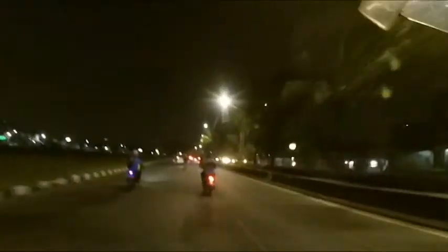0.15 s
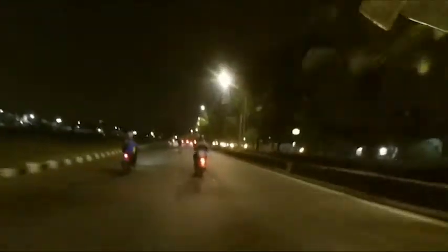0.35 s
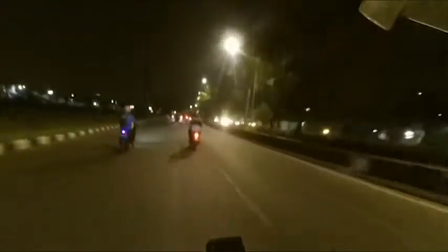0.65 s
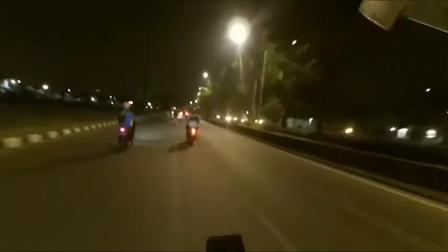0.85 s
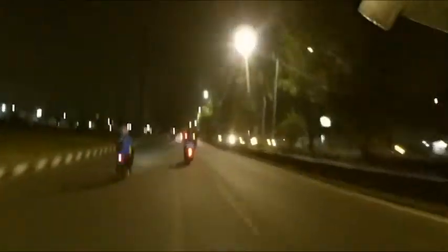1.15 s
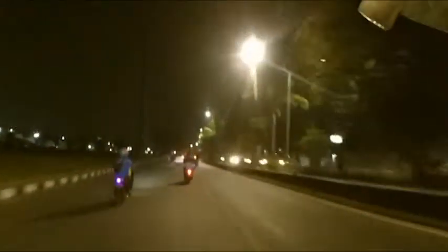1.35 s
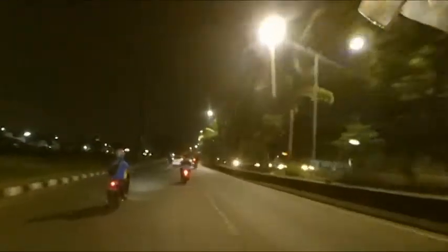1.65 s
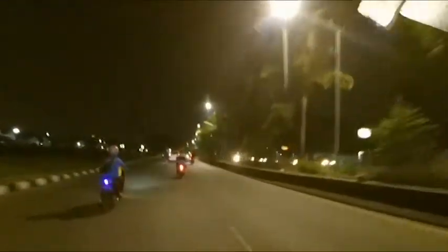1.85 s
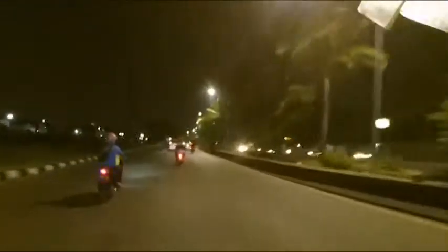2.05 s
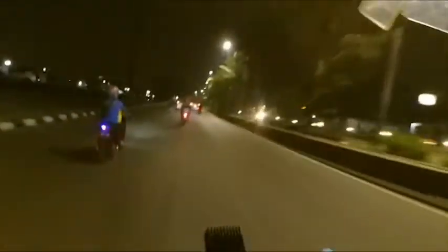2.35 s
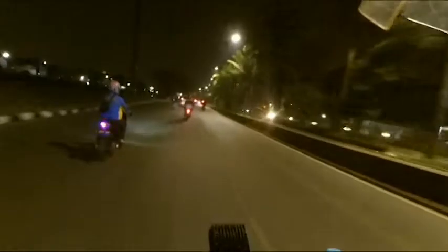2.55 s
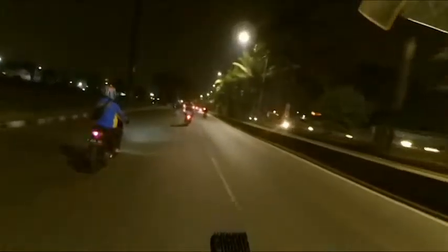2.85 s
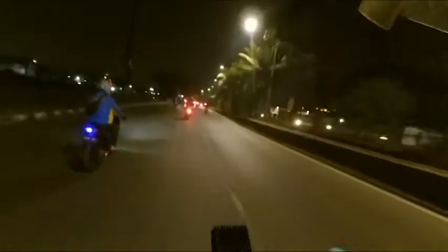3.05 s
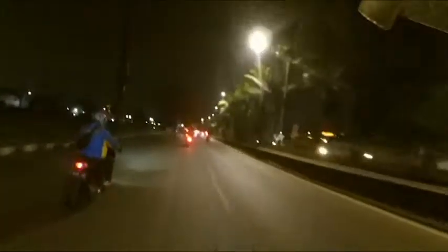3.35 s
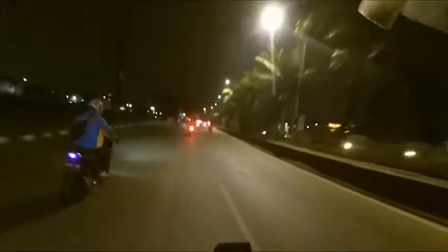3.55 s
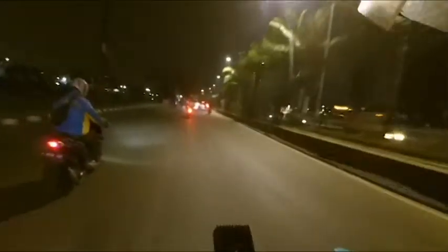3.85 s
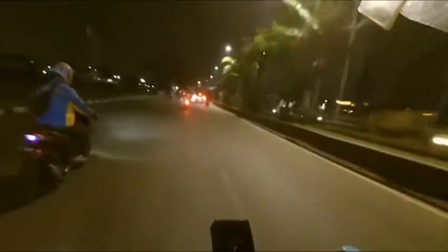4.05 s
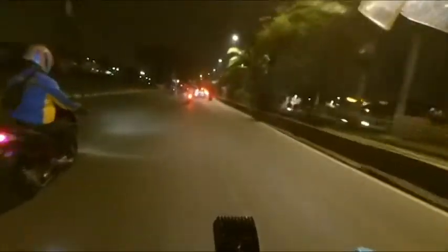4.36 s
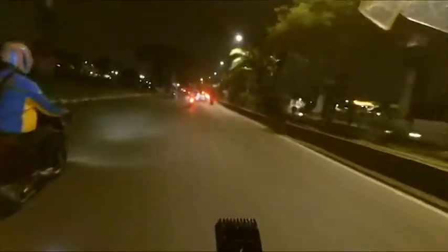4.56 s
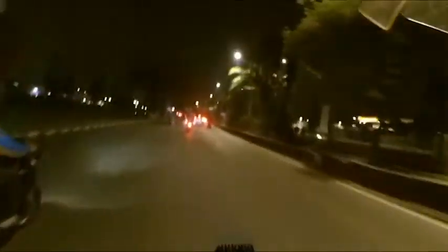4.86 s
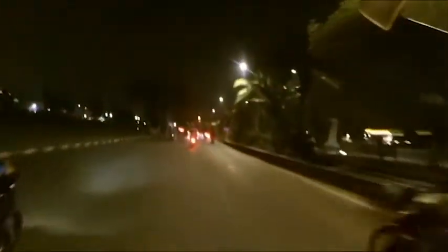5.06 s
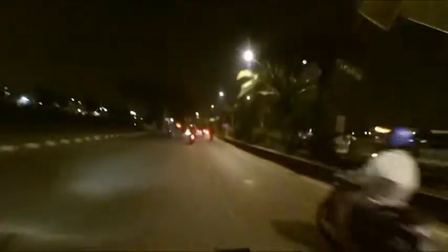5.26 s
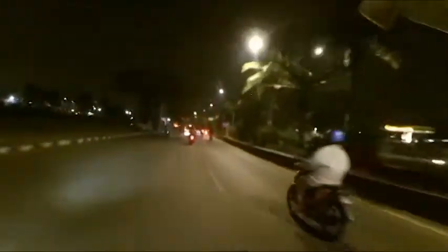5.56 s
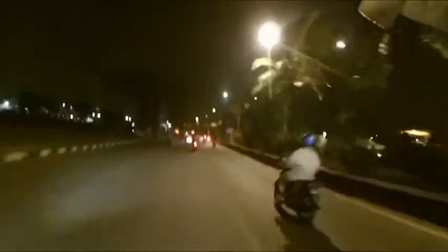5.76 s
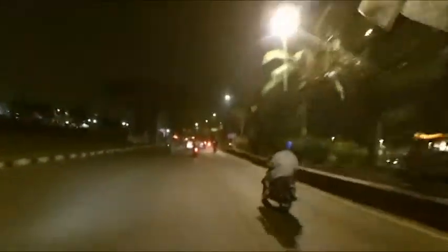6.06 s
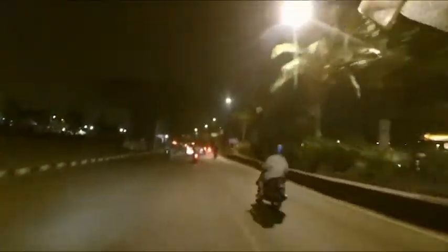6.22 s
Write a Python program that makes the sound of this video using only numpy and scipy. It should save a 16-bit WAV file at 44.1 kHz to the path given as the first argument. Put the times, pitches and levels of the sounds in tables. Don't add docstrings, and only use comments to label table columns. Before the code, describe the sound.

Throughout about 6.4 seconds, strong wind strikes a bare microphone on a moving motorcycle, almost identical in both channels and without room echo. Deep rumble and fluttering turbulence dominate, with uneven bassy thumps. Early blows come around 0.25 and 0.7 s, then a relative lull in big hits until about 1.9; a very heavy one lands at 2.2, and dense buffeting runs from 3.4 to 4.7. Beneath it a single-cylinder engine drones steadily at about 44 firings per second, barely rising. From 3 s its exhaust and dry metallic valve ticking grow stronger, peaking near 5.1-5.4. Faint frame singing, tyre roar and airy hiss continue. Around 5.0 a close motorcycle falls behind with a bright rush; about 5.45 another overtakes, duller. After 5.7 the bark and ticking ease, while wind thumps and whistling air carry on to the abrupt end.

```python
import sys
import numpy as np
from scipy import signal
from scipy.fft import rfft, irfft, next_fast_len
from scipy.io import wavfile
from scipy.ndimage import uniform_filter1d, map_coordinates

SR = 44100
rng = np.random.default_rng(int(sys.argv[2]) if len(sys.argv) > 2 else 0)


def to_linear_factor(level_db):
    exponent = np.asarray(level_db, float) / 20
    return 10 ** exponent


def store_pcm(level_fs):
    pcm = np.round(np.clip(level_fs, -1, 1) * 32767).astype(np.int16)
    wavfile.write(sys.argv[1], SR, np.atleast_2d(pcm).T)


N = 281799

# time in seconds, steady strength in dB, fineness (small eddies over big) in dB.
WIND_STRENGTH = [(0, -27, -4.5), (.35, -23, 1), (.55, -28, 1.5), (.9, -27, 2.5), (1.25, -26, 3.5),
                 (1.42, -23.5, -4), (1.6, -24, 3), (1.9, -24.5, 1), (2.45, -24, 0.1), (2.8, -23, -1.2),
                 (3.35, -21, -1.4), (3.62, -22, 0), (4, -20, 0.5), (4.25, -25.5, 3), (4.5, -20.5, 1),
                 (5.1, -23, 2.1), (5.35, -24, -0.5), (6.39, -20, -1.5)]
# frequency in Hz, density in dB per Hz.
BIG_EDDY_COLOUR = [(2, -24), (4, -30), (7, 14.5), (20, 7.5), (35, 10.5), (50, 0.5), (90, -34), (200, -75),
                   (600, -140)]
RUMBLE_COLOUR = [(20, -11), (40, 1), (55, 1.5), (100, -0.5), (150, -4), (200, -34.5), (400, -62),
                 (1500, -140)]
FLUTTER_COLOUR = [(80, -27), (150, -1), (190, 0), (300, -8.5), (450, -16), (800, -28.5), (1500, -37.5),
                  (4000, -57), (9000, -140)]
# time in seconds, pressure (mostly suction) in full scale,
# half-height width in ms, wake in dB.
LARGE_THUMPS = [(0.248, 0.57, 10.2, 12), (0.28, -0.45, 9.5, 10), (0.729, 0.33, 11, 11),
                (1.942, -0.38, 10, 4), (2.043, -0.45, 8.2, 10), (2.24, -0.82, 6.1, 14),
                (2.699, -0.53, 5.5, 2), (2.715, -0.3, 6, 13.5), (2.888, -0.29, 7.9, 5),
                (3.029, 0.14, 4, 8.5), (3.489, -0.73, 12.2, 5.5), (3.663, -0.59, 11, 5),
                (3.776, -0.36, 9.2, 2.5), (3.949, -0.63, 7.8, 7.5), (3.996, -0.5, 13, 13),
                (4.111, 0.4, 17, 6), (4.141, -0.33, 7.7, 6.5), (4.445, 0.35, 8.3, 3),
                (4.504, -0.41, 10.3, 0), (4.59, 0.37, 16, 7.5), (4.624, -0.39, 8.8, 5),
                (4.699, -0.23, 11, 4), (4.969, 0.32, 9.2, 3.5), (5.433, 0.23, 7.6, 8),
                (5.549, -0.36, 11.6, 6), (5.729, -0.33, 4.3, 7.5), (5.959, -0.26, 28, 9),
                (6.052, 0.5, 7.2, 8), (6.109, -0.32, 12.6, 7), (6.269, -0.43, 13.3, 6)]
# time in seconds, pressure in full scale, half-height width in ms.
LESSER_THUMPS = [(0.219, -0.46, 6.4), (0.229, -0.33, 4.8), (0.268, -0.5, 8.1), (0.295, 0.32, 4.7),
                 (0.329, 0.14, 22), (0.676, -0.25, 5.7), (0.688, 0.26, 4.2), (0.719, -0.31, 9.6),
                 (0.904, 0.26, 5.4), (1.397, -0.25, 6.2), (1.9, -0.2, 19), (1.956, 0.13, 25),
                 (2.088, -0.31, 6.2), (2.111, 0.24, 8), (2.204, -0.19, 5.6), (2.216, 0.28, 7.4),
                 (2.262, 0.18, 7.4), (2.582, -0.21, 9.9), (2.688, 0.22, 16), (3.013, -0.11, 3.9),
                 (3.284, -0.22, 17), (3.447, -0.34, 2.1), (3.462, 0.14, 12), (3.529, 0.28, 5.7),
                 (3.653, 0.15, 9.6), (3.68, 0.076, 20), (3.827, -0.13, 12), (3.839, 0.34, 5.1),
                 (3.871, 0.33, 6.3), (3.889, -0.31, 6.9), (3.926, 0.29, 5.1), (3.938, 0.28, 5.7),
                 (3.96, 0.093, 4.6), (3.976, 0.3, 9.2), (3.988, 0.29, 8.4), (4.049, 0.17, 3.8),
                 (4.13, 0.22, 8.7), (4.169, 0.17, 5.4), (4.237, -0.083, 6.5), (4.368, 0.14, 18),
                 (4.388, -0.19, 16), (4.479, 0.2, 4.2), (4.514, -0.26, 5.4), (4.532, 0.27, 10),
                 (4.545, -0.025, 4.2), (4.579, 0.09, 4), (4.679, 0.19, 9.4), (4.755, 0.18, 3.7),
                 (4.774, -0.21, 11), (4.986, -0.29, 2.5), (5.002, -0.22, 3), (5.448, -0.29, 3.9),
                 (5.469, -0.27, 9.5), (5.536, 0.14, 4.6), (5.935, 0.26, 24), (6.026, -0.23, 6.2),
                 (6.092, 0.3, 3.4), (6.241, 0.31, 5.9), (6.303, 0.16, 9.9), (6.346, -0.27, 5.5)]
# time in seconds, half length in seconds, then big, middle and small eddies in dB.
GUSTS_AND_LULLS = [(0.055, 0.064, 4.5, 4.5, 5), (0.657, 0.047, -3, -1.5, 5), (0.836, 0.076, 3, 1.5, 0),
                   (1.105, 0.035, 12.5, -12, -5), (1.6, .12, -1, -4, -4), (0.545, .05, 3.5, 4.5, -2.5),
                   (1.05, 0.044, -2, 3, 2.5), (1.703, 0.067, 4, 0, -4.5), (1.97, 0.081, -10, 3, -3),
                   (2.303, 0.069, 2.5, -2, -2), (4.42, 0.14, -3, 4, 0.5), (4.676, 0.047, -3, 6, 2),
                   (1.893, 0.057, -10, 3, 3.5), (2.148, 0.12, 6, -6, 1.5), (2.713, 0.063, 2, -4, -0.5),
                   (3.15, 0.059, -7.5, 0.5, -1), (3.44, 0.06, 2, 6.5, 0.5), (3.615, 0.085, 2.5, -5, -1.5),
                   (4.353, 0.074, 6.5, -0.5, -2), (4.504, 0.12, -2, 3.5, 2.5), (4.794, 0.07, -1, 0, 0),
                   (4.955, 0.063, -4, -6, -2.5), (5.27, 0.044, 0.5, -2, -0.5), (5.72, 0.056, -6, -1, -3),
                   (5.143, 0.085, -6, -4.5, -7), (5.297, 0.044, 3, -0.5, -0.5), (5.746, 0.067, 2, -2.5, 0),
                   (5.89, 0.053, -15, -4.5, 0), (6.16, 0.032, -5, -8.5, -5)]
# time in seconds, firings per second.
FIRING_RATE = [(0.0, 43.622), (0.8, 44.187), (1.6, 44.153), (2.4, 44.281), (3.19, 44.468), (3.99, 44.688),
               (4.79, 44.786), (5.59, 44.781), (6.39, 44.614)]
# time in seconds, load in dB, throttle bark in dB, valve force in dB,
# hot gas in dB (the middle pipe sounds higher).
ENGINE_LOAD = [(0, -3.5, -6, -3, -12), (.8, -7, 0.5, -1, -14), (1.6, 0, -1, -5, -11),
               (2.4, 3.5, 0, 6.5, -10), (3.2, 13, 3.5, 8, -19), (4, 12.5, 0, 4, -15), (4.3, 12, 3, 12, -15),
               (4.6, 0, 1, 6, -10), (4.9, 6, 1.5, 9, -11), (5.1, 14.5, 6.5, 17.5, -8),
               (5.4, 10, 7, 10, -11), (5.65, 8, 7, 11, -3), (5.85, -6, 1.5, 5, -3), (6.05, -13, -7, -6, 4),
               (6.39, 1, -5, -11, -1)]
# frequency in Hz, width in Hz, level in dB.
LOW_PIPE_MODES = [(244, 147, -2), (349, 35, -8.5)]
HIGH_PIPE_MODES = [(698, 46, 3), (880, 120, 1)]
VALVE_MODES = [(4700, 1400, 17), (6750, 1360, 27), (7670, 1700, 25.5), (11400, 5000, 7)]
# time in seconds, peak in dB.
HARD_SEATINGS = [(1.3024, -50), (1.8448, -47), (2.0259, -43), (2.1397, -43), (2.3655, -42), (2.637, -41),
                 (2.7719, -51), (2.8169, -55), (2.8395, -46), (3.0418, -41), (3.1767, -39), (3.199, -40),
                 (3.2212, -54), (3.3113, -44), (3.3338, -42), (3.356, -39), (3.3783, -43), (3.4236, -44),
                 (3.492, -37), (3.5358, -38), (3.5584, -42), (3.5802, -35), (3.626, -31), (3.6474, -48),
                 (3.6706, -42), (3.715, -35), (3.7374, -47), (3.7821, -49), (3.8046, -40), (3.8275, -35),
                 (3.8495, -40), (3.8947, -42), (3.917, -35), (3.939, -41), (3.9615, -43), (3.9836, -38),
                 (4.0284, -33), (4.0509, -43), (4.1625, -31), (4.2526, -39), (4.4533, -41), (4.4979, -47),
                 (4.5215, -41), (4.6544, -41), (4.6765, -35), (4.7231, -42), (4.81, -33), (4.9448, -37),
                 (4.9675, -37), (5.0118, -31), (5.0341, -35), (5.0563, -32), (5.1008, -31), (5.124, -31),
                 (5.257, -26), (5.2795, -32), (5.324, -26), (5.3693, -29), (5.4369, -36), (5.5926, -36)]
# frequency in Hz, width in Hz, level in dB, start in seconds, length in seconds.
FRAME_MODES = [(1842, 45, -59.5, -.5, 1.75), (1820, 90, -64, 1.1, 2.1), (1812, 50, -61, 3, 1.6),
               (1832, 55, -57.5, 4.9, .7), (2510, 80, -65.5, 0, 1.7), (2675, 41, -66, 2, 2.8),
               (2675, 60, -64, 5.3, 1.4), (3100, 250, -64.5, 5.3, 1.4), (3400, 200, -68, 0, 1.4),
               (3660, 200, -66.5, -.5, 1.9), (3400, 170, -72, 1.8, 2.6), (3780, 120, -69.5, 2, 3),
               (4050, 250, -65, 3.7, .6), (7100, 700, -59, 3.35, .4), (6400, 370, -57.5, 3.8, .55)]
# time abreast in seconds, side gap in m, speed over ours in m/s,
# tyres in dB at 1 m, dragged air in dB abreast, tyres dull above Hz.
NEIGHBOURS = [
    (4.98, 1.9, -5, 3.5, -47.5, 6000),
    (5.45, 3.65, 6, 6.5, -54, 3200),
]
# frequency in Hz, density in dB per Hz.
OWN_ROAR_COLOUR = [(400, -4), (900, -0.5), (1020, -4.5), (1250, -7.5), (1500, -5.5), (2150, -7.5),
                   (2600, -7.5), (2760, -11.5), (3050, -15), (3400, -11), (3800, -12.5), (4100, -16.5),
                   (4500, -18), (7000, -120)]
PASSING_ROAR_COLOUR = [(400, -5), (900, 2), (1400, -3), (2200, -4), (2800, -8), (3500, -9), (4500, -10.5),
                       (7000, -120)]
HISS_COLOUR = [(2500, -57), (4000, -11), (4900, -0.5), (5800, -1), (7200, 0.5), (9000, -3.5), (10500, -10),
               (13000, -20), (15200, -26)]
AIR_COLOUR = [(5000, -46), (7500, 9.5), (9000, 4.5), (11000, -0.5), (13000, -7), (15200, -12)]
# time in seconds, half length in seconds, swell in dB.
WHISTLE_SWELLS = [
    (.3, .15, 5),
    (0.952, .15, 7),
    (1.6, 0.16, 1),
    (2.05, .15, 3),
    (2.9, .12, 4),
    (3.6, .15, -1),
    (4.15, .12, -4),
    (6.2, .15, 4),
]


def wind():
    strength_db, fine_db = curves(WIND_STRENGTH)
    mean_db = strength_db.mean()
    swing_db = strength_db - mean_db
    lump = wobble(28)
    big = rush(BIG_EDDY_COLOUR, patchy_db=.5, lumps=to_linear_factor(.5 * lump))
    big = unit(big - 0.039 * (big ** 2 - 1))
    middle = rush(RUMBLE_COLOUR, patchy_db=.6, lumps=to_linear_factor(1.2 * lump + .8 * wobble(20)))
    small = rush(FLUTTER_COLOUR, patchy_db=1.2, lumps=to_linear_factor(1.1 * lump + 1.1 * wobble(45)))

    push, cover, wake_db = thumps()
    big_db, middle_db, small_db = puffs()
    gust = wobble(9)
    big_db = big_db + 1.34 * swing_db + 0.81 * wake_db + 0.73 * gust - 0.49 * fine_db
    middle_db = middle_db - 3 + swing_db + 0.76 * wake_db + 0.41 * gust + 0.72 * fine_db
    small_db = small_db - 11 + 0.55 * swing_db + 0.81 * wake_db + 0.16 * gust + fine_db

    thump_bed = to_linear_factor(big_db) * big * (1 - 0.41 * cover)
    rumble = to_linear_factor(middle_db) * middle * (1 - 0.48 * cover)
    flutter = to_linear_factor(small_db) * small * (1 - 0.098 * cover)
    return push + to_linear_factor(mean_db) * (thump_bed + rumble + flutter)


def thumps():
    large_rebound, lesser_rebound, lesser_wake_db = 0.25, 0.11, 2
    flank_widths = 1.47
    wake_rise_s, wake_fall_s = 0.032, 0.043
    push, cover, wake = np.zeros(N), np.zeros(N), np.zeros(N)
    t = np.arange(N) / SR

    def bell(u):
        return np.exp(-4 * np.log(2) * u ** 2)

    large = [(*row, large_rebound) for row in LARGE_THUMPS]
    lesser = [(*row, lesser_wake_db, lesser_rebound) for row in LESSER_THUMPS]
    for s, pressure, width_ms, wake_db, rebound in large + lesser:
        centre = round(s * SR)
        near = slice(max(centre - SR // 4, 0), centre + SR // 4)
        late_s = t[near] - s
        u = late_s * 1000 / width_ms
        flanks = bell(u - flank_widths) + bell(u + flank_widths)
        push[near] += 1.15 * pressure * (bell(u) - rebound * flanks)
        cover[near] += np.exp(-(u / 2.67) ** 2)
        spread_s = np.where(late_s < 0, wake_rise_s, wake_fall_s)
        wake[near] = np.maximum(wake[near], wake_db * np.exp(-(late_s / spread_s) ** 2))
    vented = push - uniform_filter1d(push, size=SR // 8)
    return vented, np.clip(cover, 0, 1), wake


def puffs():
    t = np.arange(N) / SR
    return sum(np.outer(db, np.exp(-((t - s) / half_s) ** 2)) for s, half_s, *db in GUSTS_AND_LULLS)


def engine():
    turns = np.cumsum(curves(FIRING_RATE)[0]) / SR - .29
    ticks = np.flatnonzero(np.diff(np.floor(turns)) > 0)
    load_db, bark_db, valve_db, hot_db = curves(ENGINE_LOAD)
    shake = to_linear_factor(-42) * np.sin(2 * np.pi * turns) + to_linear_factor(-46) * np.sin(6 * np.pi * turns)
    return valves(ticks, valve_db) - exhaust(ticks, load_db, bark_db, hot_db) + shake + frame()


def exhaust(ticks, load_db, bark_db, hot_db):
    chance = rng.standard_normal((3, len(ticks)))
    puff_s = -.0008 + .00006 * chance[0]
    body = train(ticks, puff_s, to_linear_factor(0.76 * chance[1]))
    low = ringing(ringing(body, LOW_PIPE_MODES), [(257, 186, 0)])
    crest = train(ticks, puff_s + .0016, to_linear_factor(1.2 * chance[2]))
    front = swelling(crest, [(620, 600, 0)])

    leads_s, lingers_s = 0.14, 0.42
    n = np.arange(N)
    long_bark_db = np.max([np.interp(n + s * SR, n, bark_db) for s in (leads_s, 0, -lingers_s)], axis=0)
    low_db = -43.5 + 0.46 * load_db
    middle_db = -49 + bark_db + .9 * wobble(5)
    high_db = -71 + 12 * np.tanh(long_bark_db / 7.5)

    out = to_linear_factor(low_db) * low
    out = out + to_linear_factor(middle_db) * swelling(front, [(533, 95, 0)])
    out = out + to_linear_factor(-49 + hot_db) * swelling(front, [(633, 140, 0)])
    out = out + to_linear_factor(high_db) * swelling(front, HIGH_PIPE_MODES)
    return dulled(out, 1030)


def valves(ticks, valve_db):
    burst = to_linear_factor(-60 * np.arange(600) / SR / 0.022)
    usual = train(ticks, -.0005, to_linear_factor(2.5 * rng.standard_normal(len(ticks))))
    hard_s, hard_db = np.transpose(HARD_SEATINGS)
    hard = np.bincount((hard_s * SR).astype(int), to_linear_factor(0.79 * hard_db), N)

    def clatter(blows):
        noise = np.convolve(blows, burst)[:N] * rng.standard_normal(N)
        return ringing(ringing(noise, VALVE_MODES), [(7500, 23000, 0)])

    return to_linear_factor(-67 + valve_db) * clatter(usual) + to_linear_factor(-62) * clatter(hard)


def frame():
    fade_s = 0.079
    t = np.arange(N) / SR
    unsteady_db = .5 * wobble(7)

    def opens(s):
        return (1 + np.tanh((t - s) / fade_s)) / 2

    sing = np.zeros(N)
    for hz, width_hz, db, from_s, length_s in FRAME_MODES:
        gate = opens(from_s) - opens(from_s + abs(length_s))
        sing += to_linear_factor(db + unsteady_db) * gate * ringing(rng.standard_normal(N), [(hz, width_hz, 0)])
    return sing


def traffic():
    each, air = riders()
    t = np.arange(N) / SR
    draught = .6 * wobble(40) + .5 * wobble(11)

    passing = np.zeros(N)
    for gain, row in zip(each, NEIGHBOURS):
        passing += gain * dulled(rush(PASSING_ROAR_COLOUR, patchy_db=0.8), row[-1])
    own = to_linear_factor(-49.5) * rush(OWN_ROAR_COLOUR, patchy_db=0.53)
    roar = to_linear_factor(0.77 * draught) * (own + to_linear_factor(-43.5) * passing)

    hiss_gain = np.hypot(to_linear_factor(-55), to_linear_factor(-47.5) * np.hypot(*each))
    hiss = hiss_gain * to_linear_factor(0.67 * draught) * rush(HISS_COLOUR, patchy_db=0.55)
    lower = filtered(hiss, lambda hz: 1 / (1 + (hz / 6300) ** 8))
    hush_db = -1.3 * (1 + np.tanh((t - 5.5) / .3))
    hiss = hiss + lower * (to_linear_factor(hush_db) - 1)

    swell_db = sum(db * np.exp(-((t - s) / half_s) ** 2) for s, half_s, db in WHISTLE_SWELLS) + wobble(5.9)
    air_gain = np.hypot(air, to_linear_factor(-65.5 + swell_db))
    return roar + hiss + to_linear_factor(1.6 * draught) * air_gain * rush(AIR_COLOUR, patchy_db=-0.5)


def riders():
    shadow_db, shadow_m = -2, 0.6
    air_power, air_trails = 5.4, 0.65
    t = np.arange(N) / SR
    tyres, air = [], 0
    for s, side_m, speed, tyre_db, air_db, _ in NEIGHBOURS:
        ahead_m = speed * (t - s)
        metres = np.hypot(side_m, ahead_m)
        screen_db = shadow_db * (1 - np.tanh(ahead_m / shadow_m + 1)) / 2
        tyres.append(to_linear_factor(tyre_db + screen_db) / metres)
        air_m = np.hypot(side_m, 1.16 * ahead_m * np.where(t > s, air_trails, 1))
        air = np.hypot(air, to_linear_factor(air_db) * (side_m / air_m) ** air_power)
    return tyres, air


def unit(x):
    return x / np.sqrt(np.mean(x ** 2) + 1e-20)


def curves(rows):
    s, *cols = np.transpose(rows)
    return [np.interp(np.arange(N) / SR, s, c) for c in cols]


def wobble(rate):
    knots = rng.standard_normal(int(N * rate / SR) + 4)
    return map_coordinates(knots, [np.arange(N) * rate / SR])


def train(ticks, delay_s, sizes):
    return np.bincount(np.clip((ticks + delay_s * SR).astype(int), 0, N - 1), sizes, N)


def filtered(x, response):
    m = next_fast_len(N + SR // 2)
    return irfft(rfft(x, m) * response(np.fft.rfftfreq(m, 1 / SR)), m)[:N]


def dulled(x, top_hz):
    return filtered(x, lambda hz: 1 / np.hypot(1, (hz / top_hz) ** 4))


def resonance(f, centre, width):
    return 1j * f * width / (centre * centre - f * f + 1j * f * width)


def ringing(x, modes):
    return unit(filtered(x, lambda f: sum((-1) ** k * to_linear_factor(db) * resonance(f, c, w)
                                          for k, (c, w, db) in enumerate(modes))))


def swelling(x, modes):
    return unit(filtered(x, lambda f: sum(to_linear_factor(db) * np.abs(resonance(f, c, w)) ** 1.5 for c, w, db in modes)))


def rush(spectrum, patchy_db, lumps=1):
    z = signal.stft(rng.standard_normal(N + 512), nperseg=512)[2]
    field = uniform_filter1d(rng.standard_normal(z.shape), size=6, axis=0)
    field = uniform_filter1d(field, size=10, axis=1)
    white = signal.istft(z * to_linear_factor(patchy_db * unit(field)), nperseg=512)[1][:N]
    f, db = np.transpose(spectrum)
    return unit(filtered(white * lumps, lambda hz: to_linear_factor(np.interp(np.log(hz + 0.091), np.log(f), db))))


def scene():
    return np.tile(wind() + engine() + traffic(), (2, 1))


def top_cut(x):
    return signal.sosfilt(signal.butter(12, 15210, fs=SR, output="sos"), x)


def record(dry):
    x = filtered(dry[0], lambda hz: hz < 15270)
    drift = to_linear_factor(-61) * rush([(5, 7), (60, -1), (150, -40), (300, -60), (500, -120)], patchy_db=1.1)
    return top_cut(np.array([x + drift, x - drift]))


dry = scene()
out = record(dry)
store_pcm(out)
```